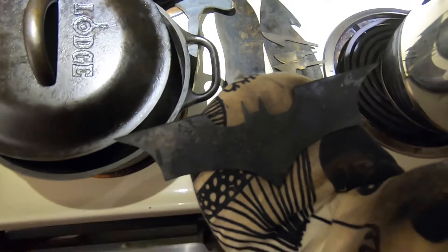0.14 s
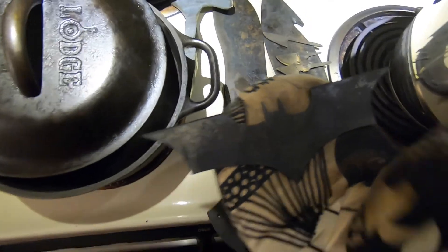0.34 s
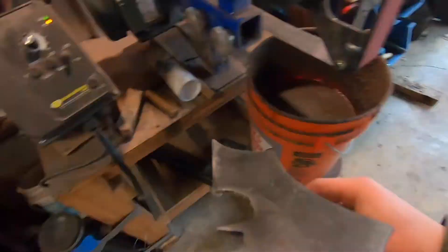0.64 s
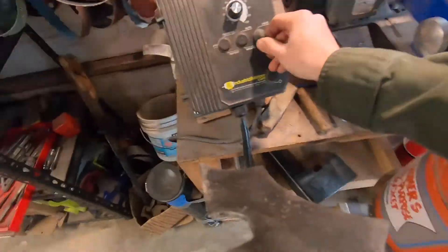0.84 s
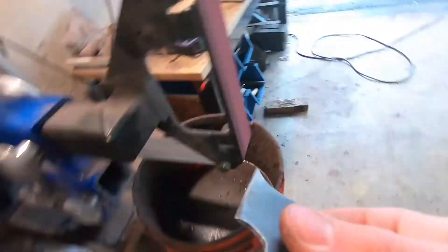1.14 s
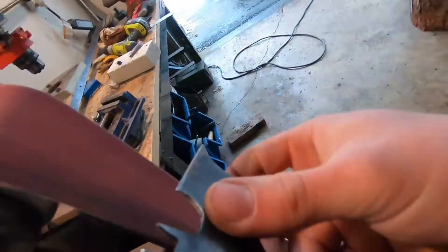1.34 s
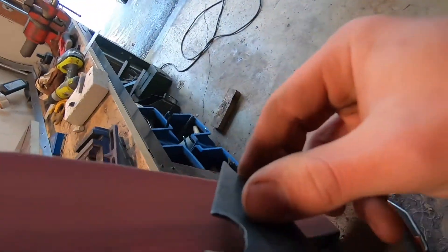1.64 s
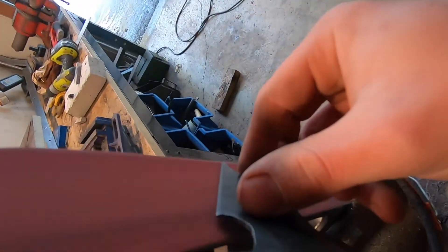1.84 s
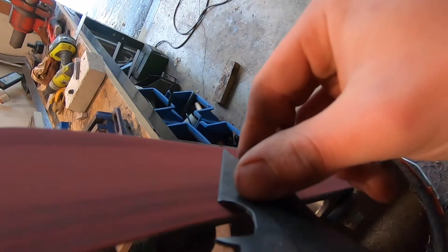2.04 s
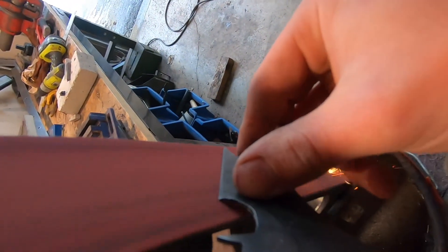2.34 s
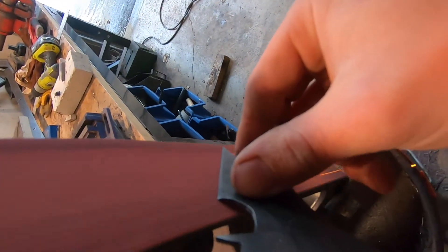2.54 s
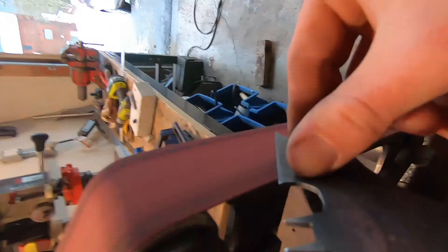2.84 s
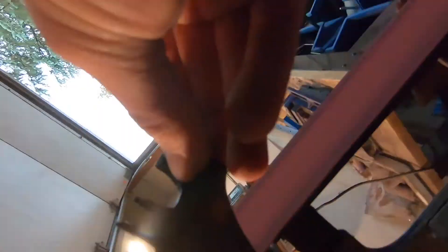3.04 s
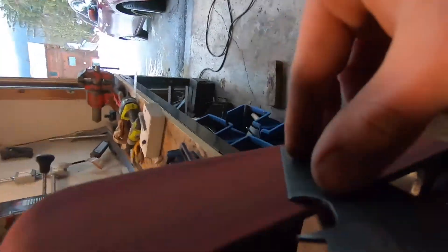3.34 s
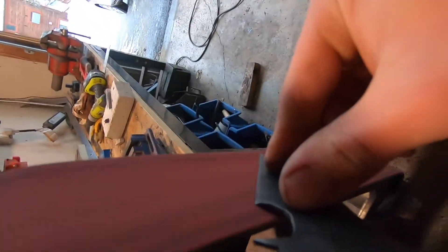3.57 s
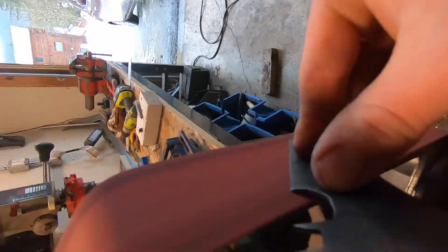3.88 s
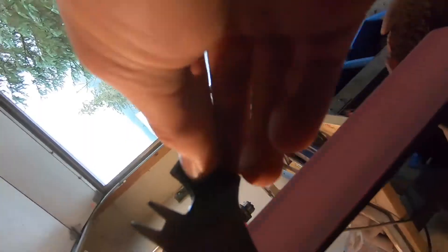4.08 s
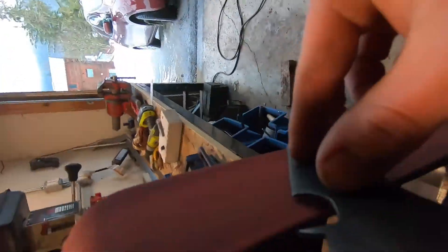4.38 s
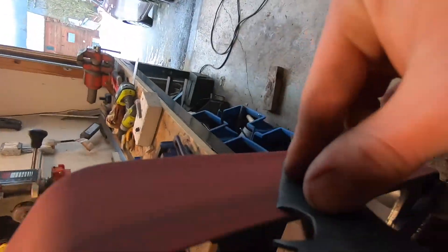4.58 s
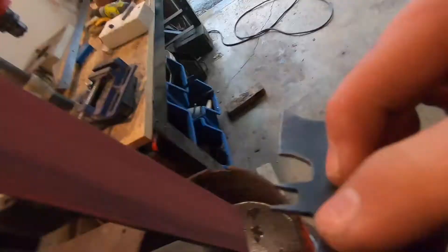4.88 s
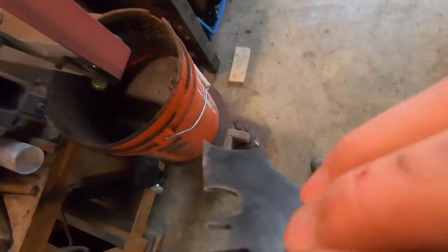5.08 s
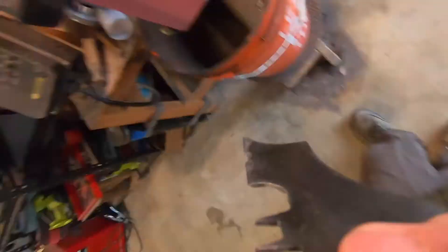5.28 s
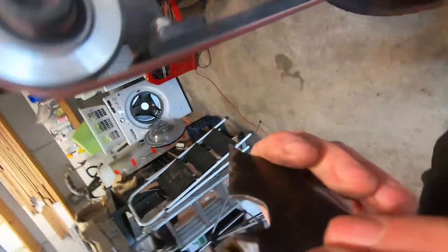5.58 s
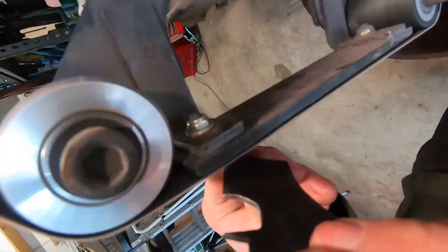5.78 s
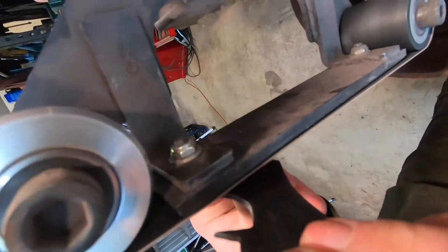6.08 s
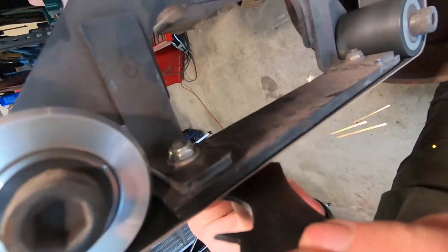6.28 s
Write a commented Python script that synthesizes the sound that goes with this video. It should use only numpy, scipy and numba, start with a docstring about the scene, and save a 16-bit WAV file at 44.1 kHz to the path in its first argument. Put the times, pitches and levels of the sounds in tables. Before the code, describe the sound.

Half a second of very quiet kitchen air ends with a scrape and a blunt bump on the microphone. In a workshop, a soft fan hums, a switch snaps, and a belt grinder growls and whines up to full speed. A steel blade is pressed to the belt four times, each pass a bright metallic hiss over the steady motor. Close body-worn microphone; the loudness is squeezed automatically.

```python
"""Kitchen, then a belt grinder

Still kitchen air ends in a scrape (shaped noise) and a bump (flattened low tones) on the microphone.
In a workshop a fan hums under moving air, a switch clicks (damped rings) and a belt grinder runs up:
its tones follow the turning motor, and its belt partly repeats its roughness every lap.
A steel blade is pressed on the belt four times and hisses in its own resonances.
An automatic gain turns the loud machine down and lets it back more slowly."""
import sys
import numpy as np
from scipy import signal
from scipy.fft import rfft, irfft, next_fast_len
from scipy.io import wavfile
from scipy.ndimage import uniform_filter1d
from numba import njit

SR = 44100
rng = np.random.default_rng(int(sys.argv[2]) if len(sys.argv) > 2 else 0)


def int16_out(signal):
    """Quantize to a 16-bit WAV file."""
    q = np.round(np.clip(np.atleast_2d(signal).T, -1, 1) * 32767)
    wavfile.write(sys.argv[1], SR, q.astype(np.int16))


N = 282885
T = np.arange(N) / SR  # time in seconds

# Colour of the still kitchen air. Each row: frequency in Hz, level in dB.
KITCHEN_COLOUR = [(15, -42), (25, -20), (57, -15), (93, -38), (213, -5), (249, -13), (283, -18),
                  (331, -16.5), (527, -26.5), (839, -26.5), (1140, -34.5), (3950, -42.5), (8360, -47),
                  (12000, -64), (15600, -102), (22000, -120)]
# Loudness of that air. Each row: time in seconds, level in dB.
KITCHEN_AIR = [(0.0, -54.5), (0.318, -51), (0.508, -51.5), (0.57, -61)]
# How different left and right are in the kitchen. Each row: frequency in Hz, side minus mid in dB.
KITCHEN_SIDE = [(60, 0), (110, -1), (200, -14), (380, -8), (700, -5), (1290, -1), (2380, -6), (4400, -7),
                (8120, -1), (15000, -3)]
# The microphone is rubbed and bumped. Each row: time in seconds, scrape level in dB, bump level in dB.
BUMP = [(.478, -88, -90), (.481, -34, -50), (.495, -38, -33), (.503, -44, -42), (.507, -22, -11.5),
        (.54, -22, -18), (.547, -52, -41), (.552, -92, -92)]
# Colour of the scrape. Each row: frequency in Hz, level in dB.
SCRAPE_COLOUR = [(290, -42), (500, -10), (657, -2), (1120, -9), (1290, -6), (7610, -12), (13900, -40),
                 (15600, -53)]
# Low tones mixed into the bump. Each row: frequency in Hz, relative level in dB.
BUMP_TONES = [(67, 4.5), (115, 2.5), (180, -0.5), (260, -3.5), (345, -10.5)]

# Workshop fan hum, before the gain. Each row: time in seconds, upper hum in dB, lower hum in dB.
FAN_HUM = [(0.58, -69, -78), (0.59, -46.5, -74), (1.08, -41.5, -53), (1.8, -50.5, -56), (3.3, -46, -53),
           (4.4, -40.5, -54), (5.1, -55, -74), (5.8, -39, -41.5), (6.41, -34, -31)]
# Colour of the fan's air. Each row: frequency in Hz, level in dB.
FAN_COLOUR = [(35, -86), (60, -59), (285, -11.5), (424, -22), (476, -12), (535, -12), (759, -9),
              (958, -20.5), (1210, -12.5), (1750, -25.5), (3140, -25.5), (15600, -36)]
# Loudness of the fan's air, before the gain. Each row: time in seconds, level in dB.
FAN_AIR = [(0.575, -86), (0.595, -50.5), (0.753, -42.5), (0.895, -44), (0.923, -39), (0.959, -44.5),
           (0.973, -56), (1.0, -25)]
FAN_HUM_HZ = 480  # upper hum
FAN_DUCK = 2.54  # power of the gain: the fan sinks further than the machine

# Clicks of the switch. Each row: start in seconds, reference level in dB, frequency of its own ring in Hz.
SWITCH = [(0.9063, -15.5, 4200), (0.9128, -17, 9250), (0.9174, -17, 4630), (0.9587, -17.5, 4760)]
# Rings of the switch housing. Each row: frequency in Hz, dB to the click, time in seconds to fall 60 dB.
SWITCH_MODES = [(2560, -17, 0.018), (4400, -22, 0.023), (4750, -31, 0.02), (5650, -23, 0.013),
                (8800, -10.5, 0.016), (11200, -16, 0.013)]
# Dull low knocks. Each row: start in seconds, starting level in dB, frequency in Hz.
THUDS = [(5.274, -21, 218), (5.376, -40, 291), (5.428, -35, 293), (5.584, -46, 342)]

# Faint unsteady bass, its colour. Each row: frequency in Hz, level in dB.
RUMBLE_COLOUR = [(20, -7), (40, 2.5), (100, 4.5), (170, 6), (300, -30)]
RUMBLE_DB = -69

# Run-up of the motor, as the pitch of its whine (12 times the shaft). Each row: time in seconds, Hz.
RUN_UP = [(.96, 148), (1.0, 212), (1.032, 278), (1.076, 366), (1.11, 467), (1.148, 567), (1.208, 704),
          (1.242, 773), (1.324, 811.4), (6.42, 811.4)]
# Machine levels. Each row: time in seconds, base level in dB, then, in dB to the base:
# wheel rattle, hiss, belt ring, platen ring, idler hum.
MACHINE = [(0.96, -41.5, -13, -16, -11, -15, -25), (1.08, -35.5, -7.5, -10.5, -7.5, -3.5, -20),
           (1.17, -31, -11, -4.5, -10, 3, -16), (1.26, -27.5, -8, -6, -9, 0.5, -14),
           (1.44, -30, -9, 2.5, -6, -4, -17.5), (1.9, -35.5, -7, 7.5, -20, 3.5, -14.5),
           (2.0, -39.5, -7, 6, -15, -4, -14), (2.3, -33, -23, -1, -9, -6, -11.5),
           (2.9, -26.5, -17, 0.5, -2.5, -4, -17), (3.15, -32.5, -11, -2, 3, -11, -15.5),
           (3.34, -29.5, -18, -4.5, -11, -5, -16.5), (3.96, -31, -23, 8, -4, 2.5, -9),
           (4.03, -28.5, -21, 2.5, 1, -5, -26), (4.15, -32, -9, -2, 5.5, -9.5, -16.5),
           (4.4, -28, -8, -3.5, -13, -3.5, -15), (4.85, -28.5, -23, -0.5, -27, -8.5, -21),
           (4.97, -31.5, -6, -2, -10, 0.5, -26), (5.2, -33, -4, -1, 0, 1, -21),
           (5.55, -30.5, -6, -0.5, -0.5, -1.5, -33), (5.7, -29.5, -6.5, 0, -7, -16, -23),
           (6.0, -29.5, -1.5, 2.5, -2, -11, -23), (6.41, -31, -19, 3, -12, -2.5, -13)]
# Colour of the rumbling frame. Each row: frequency in Hz, level in dB.
FRAME_COLOUR = [(90, -110), (200, -18.5), (430, -21), (600, -9.5), (800, -6), (1000, -12), (1250, -11.5),
                (1700, -69)]
# Motor tones. Each row: multiple of the shaft, peak level in dB to the base at full speed.
MOTOR = [(9, -17), (13, -11), (14, -18), (15, -16), (19, -15.5)]
# Idler wheel tones. Each row: multiple of the idler, peak level in dB to the base at full speed.
IDLER = [(2, -18), (4, -17), (5, -9), (6, -10.5), (8, -12.5)]
# Whine, loudest in a resonance of the frame. Each row: time in seconds, dB to the base.
WHINE = [(1.08, -18), (1.16, -2.5), (1.22, 2), (1.29, -4), (1.9, -4.5), (2.8, -3), (3.4, -6), (4.3, -2),
         (5.0, -2.5), (5.65, -1.5), (6.42, 1)]
# Belt noise in order: bench, guard, rattle, low hiss, belt ring, high hiss, top hiss.
# Each row: centre in Hz at full speed, width of one filter in Hz, share of power repeated each lap.
BELT = [(137, 310, 0.062), (1516, 1900, 0.1), (3200, 4500, 0.86), (6150, 11700, 0.55), (9240, 1700, 0.39),
        (13000, 13000, 0.17), (15360, 17000, 0.18)]
# Balance of the hiss. Each row: time in seconds, low part in dB to the hiss, top part in dB to the hiss.
HISS_BALANCE = [(0.96, 3, 5), (1.2, -1.5, -2), (1.45, -3.5, -7), (1.9, -3.5, -7), (2.9, 2.5, 12),
                (3.0, -6, -2), (3.3, 5, 4.5), (4.0, 0, 6), (4.1, -3, -1), (4.4, 4, 4), (4.9, 0, 2),
                (5.4, 1, -4), (5.6, -3.5, -4), (5.9, -1, -4), (6.42, -4, -5)]
# Tones inside the platen ring. Each row: multiple of the belt lap, peak dB to the ring at full speed.
LAP_LINES = [(184, -19), (194, -14), (197, -18), (203, -13), (206, -6), (208, -8), (211, -9), (212, -9),
             (214, -7), (229, -17)]
# The straining motor shakes a panel and the stand. Each row: time in seconds, panel frequency in Hz,
# panel level in dB, stand level in dB.
GROWL = [(0.96, 970, -32, -48), (0.978, 936, -29, -49), (1.038, 814, -28, -36.5), (1.084, 970, -31, -43),
         (1.102, 990, -24.5, -55), (1.17, 970, -43, -51)]
# Squeal of the new-started belt settling on its wheels. Each row: time in seconds, Hz, level in dB.
SETTLING = [(1.18, 4600, -50), (1.28, 4850, -36), (1.36, 5030, -29), (1.44, 5530, -38), (1.52, 5700, -48)]
IDLER_TURNS, BELT_LAPS = 3.489, .3003  # per motor turn
BENCH_DB, GUARD_DB = -12.5, -5.5  # to idler hum; to the base
FLICKER_DB = .9  # each part of the belt noise wavers alone
PLATEN_HZ, PLATEN_WIDTH_HZ = 4260, 560
PRESS_S = .03  # fade in seconds at touch and lift
PRESS_DAMP_DB = -4.5  # the pressed blade steadies the belt: quieter guard and rattle
PRESS_TONE_DB = -6  # motor and idler share the tones; this quiets the idler's under the blade
JOINT_DB, JOINT_HZ, JOINT_WIDTH_HZ = -13, 456, 1200  # thump of the belt joint under the blade
JOINT_LAP = .1  # shift of the thump, in laps

# Blade on the belt: one list per pass, touch to lift. Each row: time in seconds, low ring in dB,
# broad hiss frequency in Hz, then, in dB to the low ring: broad hiss, third ring, top ring, rasp.
PASSES = [
    [(1.95, -38, 7650, 3.4, -12, 4, -15), (2.03, -40.5, 7200, 5, -5, -4, -23),
     (2.1, -29.5, 7550, 7.8, -18, 9, -35), (2.33, -20.5, 8400, 6.2, -13, 7, -16.5),
     (2.42, -15, 8300, 2.1, -8, -2, -21.5), (2.7, -14.5, 8850, 4.4, -2, 7.5, -27),
     (2.885, -13.5, 8400, 3.9, -3, 7.5, -31)],
    [(3.375, -30, 6500, 0, -8, 5, -27), (3.44, -26.5, 6800, 0.5, -6, 5, -27),
     (3.52, -18.5, 8000, 3, -16, -4, -36), (3.64, -24.5, 7800, 10, 4, 5, -29),
     (3.74, -17, 8500, 3.2, -5, -4, -18), (3.985, -14, 8600, 0, -6, -8, -16)],
    [(4.465, -31, 6500, 7, -6, 10, -8), (4.53, -26.5, 6870, 6.6, -1, 9, -27),
     (4.6, -21.5, 7100, 5.3, -12, -4, -51), (4.7, -21.5, 6960, 2.4, -2, -12, -13),
     (4.81, -27, 6960, 6.2, 6.5, -5, -2.5)],
    [(5.96, -32, 7600, -13, -8, -8, -9), (6.02, -15, 7740, -16, -8.5, -15, -35),
     (6.16, -16.5, 8000, -0.5, -4.5, -7, -22), (6.28, -19, 7400, 6.5, -3, -3, -25),
     (6.42, -23, 7460, 11, 4, 2, -13)],
]
# Low ring of the blade. Each row is one pass: frequency in Hz at touch, frequency in Hz at lift.
LOW_RING = [(5000, 5040), (5160, 4940), (5230, 5030), (5380, 4820)]
# Colour of the third ring. Each row: frequency in Hz, level in dB.
THIRD_RING = [(9900, -28), (10450, -2), (11000, 6), (11800, 0.5), (12500, -30)]
# Colour of the top ring. Each row: frequency in Hz, level in dB.
TOP_RING = [(11600, -29), (12300, 0), (13000, 8), (13900, -1), (14600, -8), (15700, -25)]
# The blade radiates little under its first ring and cancels between rings. Each row: Hz, gain in dB.
BLADE_FILTER = [(1000, -42), (3500, -55), (4400, -3.5), (5200, 0), (6100, 0), (7000, 2.5), (9700, 0),
                (10250, -3.5), (10800, -1), (16000, -5)]
LOW_WIDTH_HZ, BROAD_WIDTH_HZ, RASP_HZ = 1060, 5200, 3150
EDGE_DB, EDGE_HZ, EDGE_WIDTH_HZ = -5.5, 14900, 3000  # thinnest hiss of the edge, dB to the low ring

# How different left and right are in the workshop. Each row: frequency in Hz, side minus mid in dB.
SHOP_SIDE = [(60, -6), (110, -9), (200, -22), (380, -13), (700, -30), (1290, -35), (2380, -9), (4400, -3),
             (8120, -10), (15000, -13)]
# The stereo image opens for a moment. Each row: time in seconds, side gain in dB.
WIDTH = [(1.33, -37), (1.42, -4), (1.7, 2), (1.9, 3.5), (2.02, 8.5), (2.12, -3), (2.2, -35)]
ECHO_DB, ECHO_S = -15, .005  # nearby reflections: total level, fading time
GAIN_TOP_DB, GAIN_RATIO = -23.5, 5.05  # the gain acts above this level
GAIN_ATTACK_S, GAIN_RELEASE_S = .05, .11
TOP_HZ = 15760  # upper limit of the sound


def undb(db):
    """Turn dB into a plain amplitude factor."""
    return 10 ** (np.asarray(db) / 20)


def unit(x):
    """Scale to an rms (average strength) of 1."""
    return x / np.sqrt(np.mean(x ** 2))


def curves(rows):
    """A gate that is open over a table's time span, then its columns at every sample."""
    s, *columns = np.transpose(rows)
    gate = uniform_filter1d(1. * ((T >= s[0]) & (T <= s[-1])), size=300)
    return [gate] + [np.interp(T, s, c) for c in columns]


def colour(x, points):
    """Filter by (Hz, dB) points, joined evenly in pitch."""
    size = next_fast_len(len(x))
    hz, db = np.transpose(points)
    log_hz = np.log(np.arange(size // 2 + 1) * SR / size + 1)
    gain = undb(np.interp(log_hz, np.log(hz), db, right=-70))
    return irfft(rfft(x, size) * gain, size)[:len(x)]


@njit
def svf(x, hz, width):
    """Band-pass filter with a moving centre, gain 1 there."""
    y, b, l = np.empty(len(x)), 0., 0.  # b and l: the filter's memory
    for i in range(len(x)):
        g, k = np.tan(np.pi * hz[i] / SR), width / hz[i]
        v = (b + g * (x[i] - l)) / (1 + g * (g + k))
        b, l, y[i] = 2 * v - b, l + 2 * g * v, k * v
    return y


def ring(x, hz, width_hz, count=2):
    """A resonance of rms 1, made steeper by filtering several times."""
    hz = np.clip(hz + 0 * T, 50, .45 * SR)
    for _ in range(count):
        x = svf(x, hz, 1. * width_hz)
    return unit(x)


def walk(rate):
    """Smooth random wandering with about `rate` new values a second; spread near 1."""
    k = int(SR / rate)
    steps = np.repeat(rng.standard_normal(N // k + 1), k)
    return 1.7 * uniform_filter1d(uniform_filter1d(steps, k), k)[:N]


def noise():
    """White noise: equal strength at every frequency."""
    return rng.standard_normal(N)


def side_of(x, share):
    """Scattered reflections that reach the two microphones differently."""
    echo = rng.standard_normal(3000) * np.exp(-np.arange(3000) / 800)
    scattered = signal.fftconvolve(x, echo / np.linalg.norm(echo))[:N]
    return colour(scattered, list(share) + [(20000, -10)])


def left_right(side):
    """The side signal is added on the left and subtracted on the right."""
    return side * np.array([[1], [-1]])


def bump_tones():
    """Low tones with random starting phases; the capsule flattens their tops."""
    tones = sum(undb(db) * np.sin(2 * np.pi * (hz * T + rng.random())) for hz, db in BUMP_TONES)
    return 1.78 * np.tanh(unit(tones) / 1.12)


def kitchen():
    """Still room air, ended by a scrape and a bump against the microphone; left and right."""
    on, air_db = curves(KITCHEN_AIR)
    touch, scrape_db, bump_db = curves(BUMP)
    bump, bump_side = (touch * undb(bump_db) * bump_tones() for _ in range(2))
    air_gain = on * undb(air_db + walk(15.4))
    scrape_gain = touch * undb(scrape_db)
    air = unit(colour(noise(), KITCHEN_COLOUR))
    scrape = unit(colour(noise(), SCRAPE_COLOUR))
    side = air_gain * side_of(air, KITCHEN_SIDE)
    side += scrape_gain * side_of(scrape, KITCHEN_SIDE) + undb(-22.0) * bump_side
    return air_gain * air + scrape_gain * scrape + bump + left_right(side)


def fan():
    """Two multiples of the mains hum over moving air, which is coloured noise."""
    on, upper_db, lower_db = curves(FAN_HUM)
    phase = 2 * np.pi * FAN_HUM_HZ * T
    hum = np.sqrt(2) * (undb(upper_db) * np.sin(phase) + undb(lower_db) * np.sin(phase * 3 / 4))
    air_on, air_db = curves(FAN_AIR)
    return on * hum + air_on * undb(air_db) * unit(colour(noise(), FAN_COLOUR))


def knock(s, db, hz, t60):
    """One damped ring starting at s, falling 60 dB in t60 seconds."""
    t = np.clip(T - s, 0, None)
    return undb(db) * np.sin(2 * np.pi * hz * t) * np.exp(-np.log(1000) * t / t60)


def clicks():
    """The switch snaps in its plastic housing; dull knocks come through the body."""
    out = sum(knock(s, db, hz, 0.014) for s, db, hz in THUDS)
    for s, db, hz in SWITCH:
        modes = SWITCH_MODES + [(hz, -7.0, .02)]
        out = out + sum(knock(s, db + mode_db, mode_hz, t60) for mode_hz, mode_db, t60 in modes)
    return out


def rumble(on):
    """A faint, fluttering bass that stays when the machine is ducked."""
    return on * undb(RUMBLE_DB + 1.0 * walk(9)) * unit(colour(noise(), RUMBLE_COLOUR))


def partials(turns, lines, waver_db):
    """Multiples of a rotation, each swelling slowly on its own."""
    return sum(undb(db + waver_db * walk(3.05)) * np.sin(2 * np.pi * (k * turns + rng.random()))
               for k, db in lines)


def belt_grit(laps, repeat, joint):
    """Roughness under the wheels: partly the same on every lap, with a bump where the belt is joined."""
    surface = rng.standard_normal(2172)  # one lap of belt
    surface[:24] += joint * np.hanning(24)
    place = (laps % 1 * len(surface)).astype(int)
    return np.sqrt(repeat) * surface[place] + np.sqrt(1 - repeat) * noise()


def nearby(x):
    """Bench, hands and guards reflect the hiss within milliseconds and ripple its spectrum."""
    t = np.arange(800) / SR
    echo = rng.standard_normal(len(t)) * np.exp(-t / ECHO_S)
    echo *= undb(ECHO_DB) / np.linalg.norm(echo)
    echo[0] = 1  # the direct sound
    return signal.fftconvolve(x, echo)[:N]


def starting_growl():
    """The straining motor shakes panel and stand; then the settling belt squeals upward."""
    growl_on, panel_hz, panel_db, stand_db = curves(GROWL)
    panel = undb(panel_db) * ring(noise(), panel_hz, 220)
    stand = undb(stand_db) * ring(noise(), 320, 630)
    squeal_on, squeal_hz, squeal_db = curves(SETTLING)
    squeal = undb(squeal_db) * ring(noise(), squeal_hz, 600)
    return growl_on * (panel + stand) + squeal_on * squeal


def rotating_tones(turns, idler_db, pressed):
    """Motor and idler wheel give tones at multiples of their turning."""
    motor = partials(turns, MOTOR, 4.13)
    idler = undb(PRESS_TONE_DB * pressed) * partials(IDLER_TURNS * turns, IDLER, 3.1)
    idler_hum = undb(idler_db) * np.sqrt(2) * np.sin(2 * np.pi * IDLER_TURNS * turns)
    return motor + idler + idler_hum


def frame_rumble(laps, pressed):
    """Belt roughness shakes the frame; the joint thumps under the blade once a lap."""
    frame = unit(colour(belt_grit(laps, 0.49, 1.3), FRAME_COLOUR))
    joint_hits = np.diff(np.floor(laps + JOINT_LAP), prepend=0)
    thump = ring(joint_hits, JOINT_HZ, JOINT_WIDTH_HZ)
    return frame + pressed * undb(JOINT_DB + 1.4 * walk(12)) * thump


def belt_noise(laps, speed, levels_db):
    """Roughness passing the wheels excites seven wavering bands of noise."""
    brighter = .7 + .3 * speed  # the hiss climbs as the belt gathers speed
    out = 0
    for db, (hz, width_hz, repeat) in zip(levels_db, BELT):
        centre_hz = hz * brighter * (1 + 0.014 * walk(2.93))
        band = ring(belt_grit(laps, repeat, 0), centre_hz, width_hz, count=3)
        out = out + undb(db + FLICKER_DB * walk(10)) * band
    return out


def grinder(turns, speed):
    """Tones of motor and idler over the rumbling frame, the ringing platen and the hissing belt."""
    on, base_db, rattle_db, hiss_db, ring_db, platen_db, idler_db = curves(MACHINE)
    _, low_db, top_db = curves(HISS_BALANCE)
    pressed = uniform_filter1d(sum(curves(rows)[0] for rows in PASSES), int(PRESS_S * SR))
    damp_db = PRESS_DAMP_DB * pressed
    belt_db = [idler_db + BENCH_DB, GUARD_DB + damp_db, rattle_db + damp_db,
               hiss_db + low_db, ring_db, hiss_db, hiss_db + top_db]
    laps = BELT_LAPS * turns
    tones = rotating_tones(turns, idler_db, pressed)
    frame = frame_rumble(laps, pressed)
    belt = nearby(belt_noise(laps, speed, belt_db))
    platen = undb(-1.0) * ring(belt_grit(laps, 0.58, 0), PLATEN_HZ, PLATEN_WIDTH_HZ, count=3)
    platen += speed ** 8 * partials(laps, LAP_LINES, 2.1)
    whine = undb(curves(WHINE)[1] + 1.5 * walk(5)) * np.sqrt(2) * np.sin(2 * np.pi * 12 * turns)
    # unbalance forces grow steeply with speed
    machine = undb(-4.0) * frame + speed ** 4 * tones + whine + belt + undb(platen_db) * platen
    return starting_growl() + on * undb(base_db) * machine


def blade(turns):
    """Grit scratches the steel and excites its rings; the pressure flutters with the belt."""
    laps = BELT_LAPS * turns
    flutter = undb(0.45 * walk(60) + 0.14 * np.sin(4 * np.pi * laps))  # twice a lap, plus chance
    grit = flutter * belt_grit(laps, 0.26, 0)
    third, top = unit(colour(grit, THIRD_RING)), unit(colour(grit, TOP_RING))
    rasp = ring(grit, RASP_HZ, 700)
    edge = undb(EDGE_DB) * ring(grit, EDGE_HZ, EDGE_WIDTH_HZ)
    rings = dull = 0
    for rows, touch_lift_hz in zip(PASSES, LOW_RING):
        touch, low_db, broad_hz, broad_db, third_db, top_db, rasp_db = curves(rows)
        low_hz = np.interp(T, (rows[0][0], rows[-1][0]), touch_lift_hz) * (1 + 0.012 * walk(5))
        low = ring(grit, low_hz, LOW_WIDTH_HZ)
        broad = ring(grit, broad_hz, BROAD_WIDTH_HZ, count=3)
        press = touch * undb(low_db)
        upper = undb(third_db) * third + undb(top_db) * top + edge
        rings = rings + press * (low - undb(broad_db) * broad + upper)
        dull = dull + press * undb(rasp_db) * rasp
    return colour(rings, BLADE_FILTER) + dull


@njit
def follow(db, attack, release):
    """Quick to rise, slower to fall."""
    y, e = np.empty(len(db)), 0.
    for i in range(len(db)):
        e += (db[i] - e) * (attack if db[i] > e else release)
        y[i] = e
    return y


def auto_gain(x):
    """Gain that turns down whatever exceeds the top level and recovers more slowly."""
    power = uniform_filter1d(x ** 2, size=800)
    over_db = 10 * np.log10(power + 1e-12) - GAIN_TOP_DB
    cut_db = np.clip(over_db, 0, None) * (1 - 1 / GAIN_RATIO)
    return undb(-follow(cut_db, 1 / (GAIN_ATTACK_S * SR), 1 / (GAIN_RELEASE_S * SR)))


def scene():
    """The kitchen and the workshop, whose loud machine drives the gain."""
    on, whine_hz = curves(RUN_UP)
    turns = np.cumsum(on * whine_hz / 12) / SR  # motor turns so far
    work = grinder(turns, whine_hz / whine_hz.max()) + nearby(blade(turns))
    gain = auto_gain(work)
    shop = gain * (work + clicks()) + gain ** FAN_DUCK * fan() + rumble(on)
    wide, width_db = curves(WIDTH)
    side = wide * undb(width_db) * side_of(shop, SHOP_SIDE)
    return shop + left_right(side) + kitchen()


def record(dry):
    """A steep low-pass filter cuts the top."""
    return signal.sosfilt(signal.ellip(16, .2, 70, TOP_HZ, fs=SR, output="sos"), dry)


dry = scene()
out = record(dry)
int16_out(out)
```